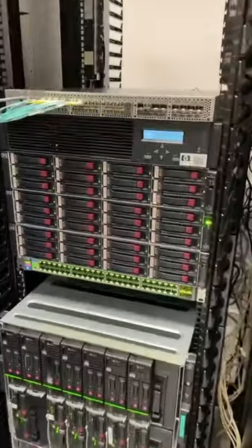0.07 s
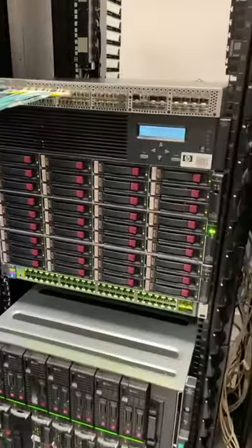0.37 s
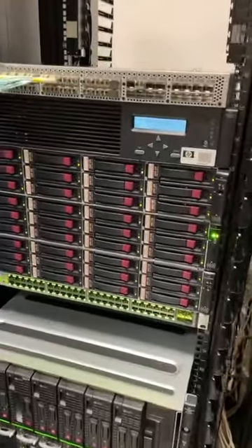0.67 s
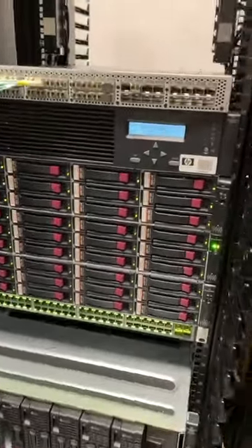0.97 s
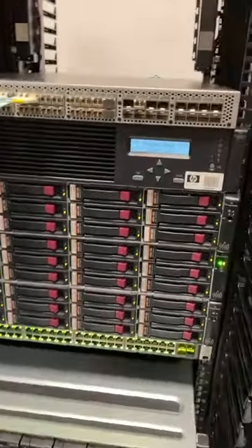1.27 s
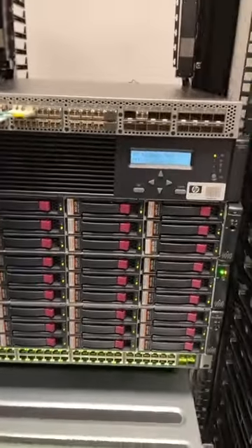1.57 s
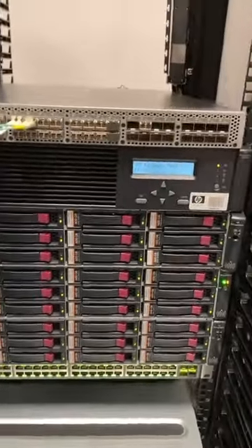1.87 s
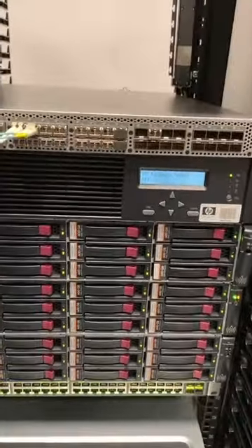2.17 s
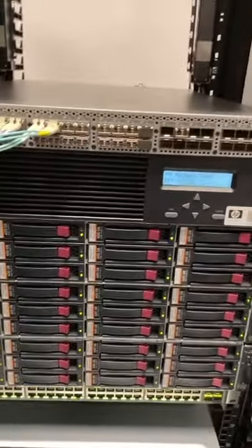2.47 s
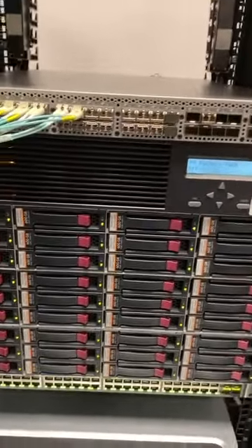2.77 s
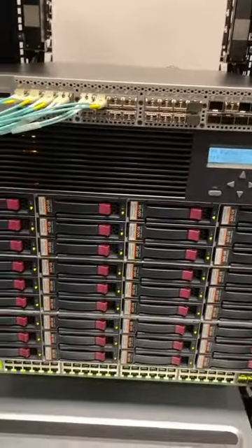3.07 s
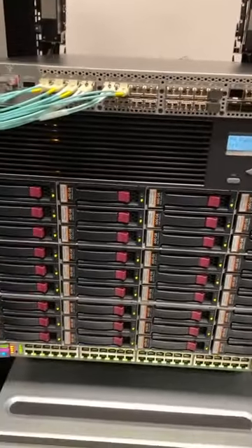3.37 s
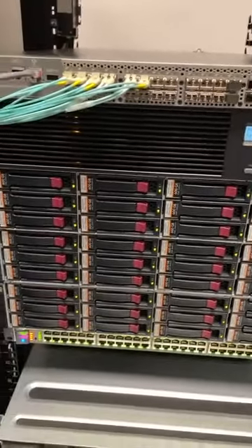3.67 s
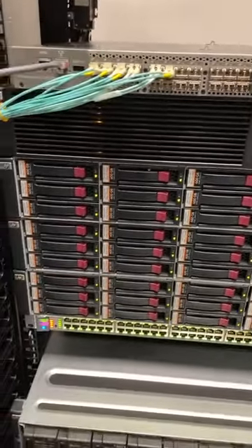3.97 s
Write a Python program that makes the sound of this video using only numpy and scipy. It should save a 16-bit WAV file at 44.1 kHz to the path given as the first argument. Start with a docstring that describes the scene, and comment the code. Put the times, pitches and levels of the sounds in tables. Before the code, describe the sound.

Server cooling fans roar steadily with wavering whines, after a brief bump on the microphone.

```python
"""A data room, on the stereo microphone of a handheld camera moving closer to the server racks.
Cooling fans drive a roar of turbulent air; reflections add gliding peaks and a fine ripple to it.
The blades add wavering whines, thin whistles and low hums; fans at nearly the same speed beat.
A hand bumps the camera at the start; near 0.5 s the low end drops away for half a second, then swells."""
import sys
import numpy as np
from scipy import signal
from scipy.fft import rfft, irfft
from scipy.io import wavfile
from scipy.ndimage import uniform_filter1d

SR = 44100
rng = np.random.default_rng(int(sys.argv[2]) if len(sys.argv) > 2 else 0)


def log_audio(samples):
    """Write samples as a 16-bit WAV file to the path given in sys.argv[1]."""
    # one column per channel
    frames = np.atleast_2d(samples).T
    # limit to full scale, then quantise
    limited = np.clip(frames, -1, 1)
    pcm = np.round(limited * 32767).astype(np.int16)
    wavfile.write(sys.argv[1], SR, pcm)


N = 176400

# Spectrum of the roar as heard, with a notch near 8 kHz and little above 13 kHz: f/Hz, relative level/dB
AIR_SPECTRUM = [(20, -46), (38, -28), (50, -12), (65, -1.5), (104, -6.5), (135, -0.5), (180, -3), (225, 1),
                (255, 0.5), (289, -2.5), (357, 2), (420, -3.5), (470, -1), (560, -4.5), (660, -7.5),
                (770, -6.5), (840, -2.5), (920, -5.5), (1030, -4.5), (1160, -9), (1330, -6.5), (1410, -7),
                (1620, -8), (1880, -8), (2040, -5), (2120, -6), (2210, -3.5), (2370, -9), (2440, -8),
                (2580, -11.5), (2750, -10), (2950, -11.5), (3200, -15), (3940, -15.5), (4330, -16.5),
                (5100, -18.5), (6000, -22), (6600, -25.5), (7200, -34), (7900, -65), (8300, -45),
                (8700, -30), (9700, -30), (11500, -35), (13000, -35), (13500, -51), (15600, -54)]
# Likeness of left and right in the roar as heard: f/Hz, correlation
AIR_LIKENESS = [(30, .99), (70, .993), (130, .996), (200, 1), (310, 1), (420, .995), (470, .98), (560, .76),
                (680, .84), (810, .74), (1040, .9), (1300, .78), (1480, .8), (1950, .76), (2150, .93),
                (2350, .8), (2550, .8), (2850, .3), (3300, .5), (4300, .5), (6100, .74), (7800, .85),
                (8800, .3), (12500, .24)]
# Balance of the roar as heard: f/Hz, left minus right/dB
AIR_LEAN = [(60, 0), (500, 0), (1600, 0), (3170, -.4), (4500, .3), (9000, -.4), (13000, 0)]
AIR_DB, SETTLED_S = -25.5, 2.0  # rms level of the air from this time on
PATCH_DB, FLUTTER_DB = 0.58, 0.42  # turbulence: local patches, and a flutter shared by all bands


def rushing_air(size=2048):
    """Turbulent air from many fans, heard as a broad roar with a centred bass and a wider treble."""
    hop = size // 4
    t, hz = np.arange(N // hop + 2) * hop / SR, np.fft.rfftfreq(size, 1 / SR)
    a, b, c, d, patches = np.moveaxis(rng.standard_normal((len(t), len(hz), 5)), -1, 0)
    patches = unit_rms(uniform_filter1d(uniform_filter1d(patches, size=8, axis=0), size=24, axis=1))
    flutter = unit_rms(uniform_filter1d(rng.standard_normal(len(t)), size=5))[:, None]
    likeness, lean_db = at_pitch(AIR_LIKENESS, hz), at_pitch(AIR_LEAN, hz)
    mid = np.sqrt((1 + likeness) / 2) * (a + 1j * b)
    side = np.sqrt((1 - likeness) / 2) * (c + 1j * d)
    spectra = np.array([(mid + side) * amp(lean_db / 2), (mid - side) * amp(-lean_db / 2)])
    spectra /= np.sqrt((1 + likeness) / 2)  # the mid signal carries the roar's spectrum
    colour_db = at_pitch(AIR_SPECTRUM, hz) + roar_swell(t, hz)
    colour_db += rack_reflections(t, hz) + room_ripple(t, hz)
    spectra *= amp(colour_db + PATCH_DB * patches + FLUTTER_DB * flutter)
    air = signal.istft(spectra, nperseg=size, noverlap=size - hop, time_axis=1, freq_axis=2)[1][:, :N]
    return amp(AIR_DB) * air / air.mean(0)[round(SETTLED_S * SR):].std()


# Centres of the roar's eight bands, from rumble to treble: f/Hz
BAND_CENTRES = [80, 170, 380, 950, 2100, 2800, 3600, 5500]
# Rumble on the way to the racks: t/s, level/dB at 80 Hz
LOW_BAND = [(.17, -36), (.27, -37), (.45, -38), (.48, -54), (.98, -52), (1.04, -40), (1.16, -48),
            (1.65, -52), (1.9, -38), (2.3, -39), (3.3, -41), (3.8, -35.5)]
# Body of the roar: t/s, level/dB at 170, 380 and 950 Hz
MID_BANDS = [(0.15, -39.5, -37, -38), (0.28, -36, -33.5, -38), (0.45, -41, -34.5, -35.5),
             (0.5, -54, -46, -40.5), (0.86, -45, -46, -41.5), (0.97, -44.5, -39.5, -39),
             (1.15, -46, -33, -35.5), (1.55, -39.5, -32.5, -33), (1.8, -35.5, -32.5, -34.5),
             (2.4, -34.5, -30, -34.5), (3.2, -36, -32, -33), (3.8, -34.5, -30.5, -34)]
# Rush on top: t/s, level/dB at 2.1, 2.8, 3.6 and 5.5 kHz
HIGH_BANDS = [(0.08, -38.5, -41, -46, -47.5), (0.3, -35.5, -39, -44, -45.5), (0.7, -36.5, -40, -41.5, -44),
              (1.05, -33, -40, -41, -43.5), (1.4, -35, -34, -42.5, -42.5), (1.9, -33.5, -34, -44, -42.5),
              (2.3, -32.5, -34, -44, -40), (2.8, -33, -36, -42.5, -40), (3.3, -34, -37, -41, -41),
              (3.9, -33.5, -39, -38.5, -41.5)]


def roar_swell(t, hz):
    """Each band of the roar dips and swells: dB against its settled mean, times x frequencies."""
    settled = np.linspace(SETTLED_S, N / SR)
    change_db = []
    for times, *levels in map(np.transpose, (LOW_BAND, MID_BANDS, HIGH_BANDS)):
        for db in levels:
            change_db.append(np.interp(t, times, db) - np.interp(settled, times, db).mean())
    blend = [np.interp(np.log(hz + 1), np.log(BAND_CENTRES), band) for band in np.eye(len(change_db))]
    return np.transpose(change_db) @ np.array(blend)


# Strong fan tones from the racks: f/Hz, line width/Hz, left minus right/dB, left lead/rad
WHINE_TONES = [(77, 1, 0, 0), (1432.3, 5, 0, .2), (1792, 4.5, -2.5, .1), (2864.5, 5, -3, -.1),
               (4668, 2.5, 3.5, -.3), (6718, 3, 0, 0)]
# The whines along the microphone's path: t/s, then level/dB of each tone above
WHINE_SWELLS = [(.1, -42, -50, -53, -48, -59, -60), (.25, -36, -49, -51, -44.5, -52, -59),
                (.45, -34, -49, -52, -43, -52.5, -58), (.48, -45, -50, -53, -47, -51.5, -57.5),
                (.8, -52, -54, -52, -51, -54, -69), (1.0, -54, -53, -52, -52, -53, -76),
                (1.25, -54, -40, -48, -44.5, -54, -76), (1.75, -52, -40.5, -48, -44, -53, -76),
                (2.15, -55, -39.5, -42, -43.5, -48.5, -76), (2.4, -47, -44, -41.5, -42.5, -46, -76),
                (2.85, -45, -45, -40, -41, -45, -74), (3.2, -46.5, -54, -42.5, -47.5, -48.5, -70),
                (3.7, -37, -48, -42.5, -48.5, -44.5, -70)]


def fan_whines():
    """Strong blade tones swell and fade as the microphone moves."""
    t, whines = np.arange(N) / SR, np.zeros((2, N))
    times, *levels = np.transpose(WHINE_SWELLS)
    for tone, db in zip(WHINE_TONES, levels):
        whines += amp(np.interp(t, times, db)) * blade_tone(*tone)
    return whines


STEADY_WIDTH_HZ = 9  # a line narrower than this is mostly one steady fan
SPEED_WANDER = 0.000395  # relative drift of fan speed, scaled down for tones above 2 kHz
TONE_APART, SWAY_RAD, FULL_WIDTH_HZ = .25, .5, 1500  # stereo spread and sway shrink below this pitch


def blade_tone(hz, width_hz, lean_db=0, lead_rad=0):
    """One steady fan beats with neighbours at nearly its speed; high tones sway as the camera moves."""
    def neighbours():
        return unit_rms(drift(width_hz) + 1j * drift(width_hz))

    steady_share = 1 / (1 + (width_hz / STEADY_WIDTH_HZ) ** 2)
    stereo = min(1, hz / FULL_WIDTH_HZ) ** 2  # low tones sound centred, nearly mono
    crowd = unit_rms(neighbours() + TONE_APART * stereo * np.array([neighbours(), neighbours()]))
    beating = np.sqrt(steady_share) + np.sqrt(1 - steady_share) * crowd
    pitch_hz = hz * (1 + SPEED_WANDER * drift(rate_hz=0.94) * min(1, 2000 / hz))
    turns = np.cumsum(pitch_hz) / SR + rng.random()
    stereo_phase = (lead_rad + SWAY_RAD * stereo * drift(rate_hz=0.67)) * np.array([[.5], [-.5]])
    wave = beating * np.exp(1j * (2 * np.pi * turns + stereo_phase))
    return np.sqrt(2) * wave.real * pan(lean_db)


# Hums and broad tones, centred: f/Hz, settled level/dB, line width/Hz
SLOW_FANS = [(54.5, -48, 4), (250, -48, 7), (345, -48, 20), (367, -52, 14), (469, -46, 14), (848, -49, 22),
             (2202, -55, 20), (2438, -54, 16)]
# Thin whistles: f/Hz, settled level/dB, line width/Hz, left minus right/dB, left lead/rad
FAST_FANS = [(3071, -55, 8, 0, 0), (4604, -60, 10, 0, 0), (8441, -59.5, 2, -6.5, 0), (10180, -72, 4, 0, 0),
             (12511, -74, 4, 0, 0), (15332, -60.5, 2, 0, -1.2)]


def hums_and_whistles():
    """Slow fans hum and fast fans whistle under the roar, rising and falling with it."""
    t, tones = np.arange(N) / SR, np.zeros((2, N))
    for hz, db, *character in SLOW_FANS + FAST_FANS:
        swell_db = roar_swell(t, np.array([hz]))[:, 0]
        tones += amp(db + swell_db) * blade_tone(hz, *character)
    return tones


# Knocks right at the microphone: t/s, level/dB, time to release/s, bottom f/Hz, top f/Hz
HAND_KNOCKS = [(0, -12, 0.015, 237, 755), (.006, -30, 0.025, 1100, 2710), (0.013, -14, 0.027, 42, 610),
               (0.027, -19.5, 0.0047, 1040, 1710), (.055, -22, 0.02, 130, 596)]
KNOCK_RISE_S, KNOCK_RELEASE_S = .003, 0.0046
KNOCK_APART = 0.68  # what each microphone port picks up alone, against what both share
BOOM_HZ, BOOM_DB, BOOM_WOBBLE, BOOM_LEAD_RAD = 92, -18.5, .05, 0.22
BOOM_RISE_S, BOOM_HOLD_S, BOOM_DECAY_S = 0.015, 0.07, 0.024


def handling_bump():
    """A hand shifts on the camera: a few dull knocks over a short boom of its body, to the left."""
    t, knocks = np.arange(N) / SR, np.zeros((2, N))
    for start, db, hold_s, low_hz, top_hz in HAND_KNOCKS:
        age = np.maximum(t - start, 0)
        band = signal.butter(3, [low_hz, top_hz], "bandpass", fs=SR, output="sos")
        rub = signal.sosfilt(band, rng.standard_normal(N) + KNOCK_APART * rng.standard_normal((2, N)))
        knocks += amp(db) * envelope(age, KNOCK_RISE_S, hold_s, KNOCK_RELEASE_S) * unit_rms(rub)
    turns = np.cumsum(BOOM_HZ * (1 + BOOM_WOBBLE * drift(rate_hz=70))) / SR
    boom = unit_rms(np.sin(2 * np.pi * turns + np.array([[BOOM_LEAD_RAD], [0]])))
    boom *= amp(BOOM_DB) * envelope(t, BOOM_RISE_S, BOOM_HOLD_S, BOOM_DECAY_S)
    return knocks * pan(lean_db=1.5) + boom * pan(lean_db=10)


# Two narrow peaks heard between the racks, one path each: t/s, f/Hz, lift/dB
RACK_PEAKS = [
    [(.3, 3250, 0), (.6, 3300, 5.5), (.8, 3430, 2), (1.0, 4030, 3), (1.35, 4080, 4), (1.7, 4120, 2.5),
     (3.4, 3550, 1.5), (3.85, 3440, 2.5)],
    [(.65, 2350, -4), (.95, 2450, 3), (1.15, 2480, 4.5), (1.45, 2620, 1.5), (1.8, 2960, -0.5),
     (2.4, 2900, 1.5), (3, 2900, -1)],
]
PEAK_WIDTH_HZ = 80


def rack_reflections(t, hz):
    """Reflections between racks lift peaks that glide as the microphone moves: dB, times x frequencies."""
    lift_db = np.zeros((len(t), len(hz)))
    for times, centre_hz, db in map(np.transpose, RACK_PEAKS):
        offset = (hz - np.interp(t, times, centre_hz)[:, None]) / PEAK_WIDTH_HZ
        lift_db += np.interp(t, times, db)[:, None] * np.exp(-offset ** 2 / 2)
    return lift_db


RIPPLE_DB, RIPPLE_S, RIPPLE_FULL_HZ = 1.6, .7, 900  # the ripple is shallower below this pitch


def room_ripple(t, hz):
    """Room reflections leave fine peaks and dips that shift with the microphone: dB on the same grid."""
    pattern = uniform_filter1d(rng.standard_normal((len(t), len(hz))), size=2, axis=1)
    pattern = unit_rms(uniform_filter1d(pattern, round(RIPPLE_S / t[1]), axis=0, mode="wrap"))
    return RIPPLE_DB * pattern * np.minimum(hz / RIPPLE_FULL_HZ, 1)


def amp(db):
    """Decibels to gain."""
    return 10 ** (np.asarray(db) / 20)


def unit_rms(x):
    """Scales to rms 1."""
    return x / np.sqrt(np.mean(abs(x) ** 2) + 1e-20)


def at_pitch(points, hz):
    """Reads a table on a log-frequency axis."""
    f, value = np.transpose(points)
    return np.interp(np.log(hz + 1), np.log(f + 1), value)


def pan(lean_db):
    """Left and right gains for a level difference."""
    return amp(np.array([[lean_db], [-lean_db]]) / 2)


def drift(rate_hz):
    """Slow random motion of rms 1."""
    hz = np.fft.rfftfreq(N, 1 / SR)
    return unit_rms(irfft(rfft(rng.standard_normal(N)) / (1 + (hz / rate_hz) ** 2), N))


def envelope(age, rise_s, hold_s, decay_s):
    """Rises in a line, holds until hold_s, then dies away."""
    return np.minimum(age / rise_s, 1) * np.exp(-np.maximum(age - hold_s, 0) / decay_s)


def scene():
    """Air, fan tones and the bump."""
    return rushing_air() + hums_and_whistles() + fan_whines() + handling_bump()


CEILING, TOP_HZ = .9, 15600


def record(dry):
    """The camera rounds off the highest peaks and limits the band."""
    rounded = dry / (1 + (dry / CEILING) ** 6) ** (1 / 6)
    lowpass = signal.firwin(1023, TOP_HZ, window=("kaiser", 9), fs=SR)
    return signal.oaconvolve(rounded, lowpass[None], "same")


dry = scene()
out = record(dry)
log_audio(out)
```